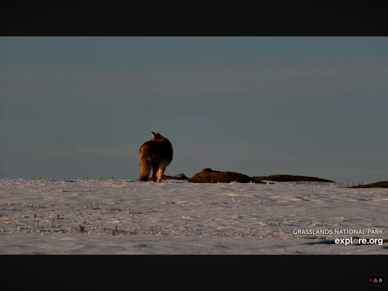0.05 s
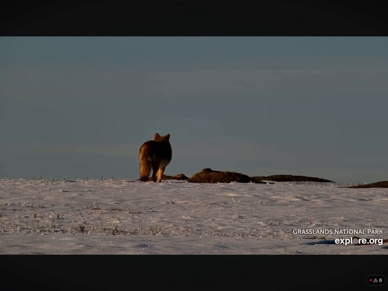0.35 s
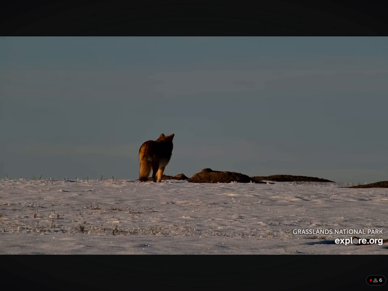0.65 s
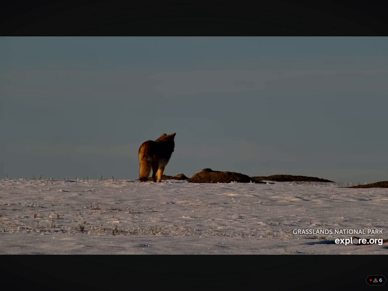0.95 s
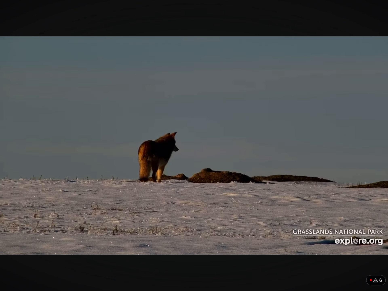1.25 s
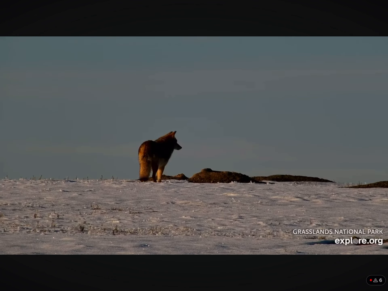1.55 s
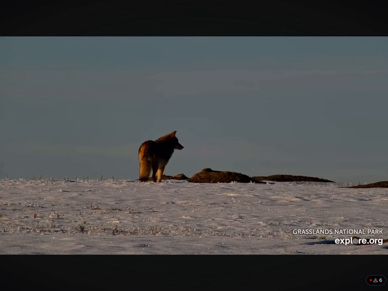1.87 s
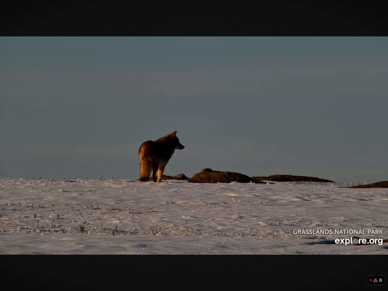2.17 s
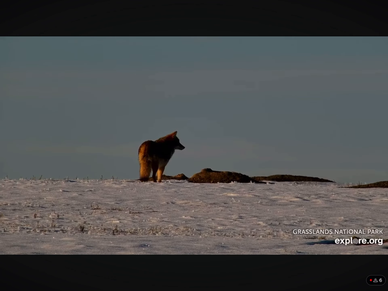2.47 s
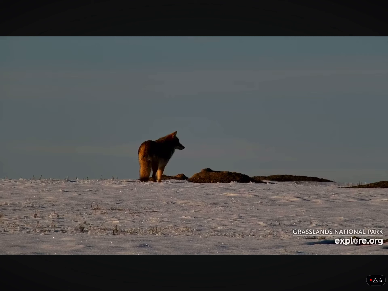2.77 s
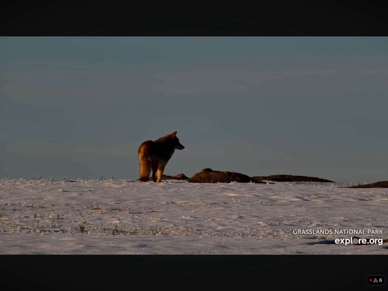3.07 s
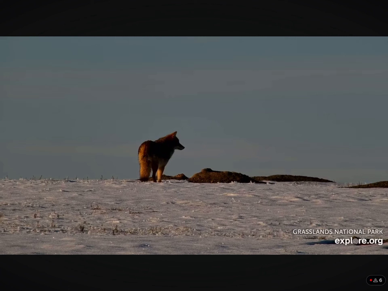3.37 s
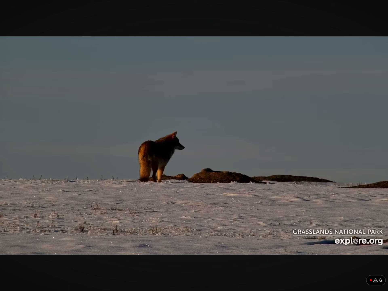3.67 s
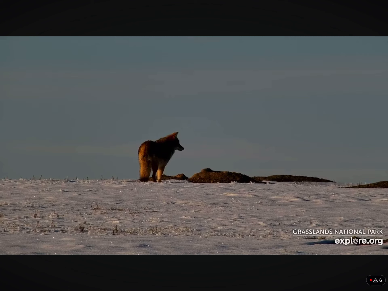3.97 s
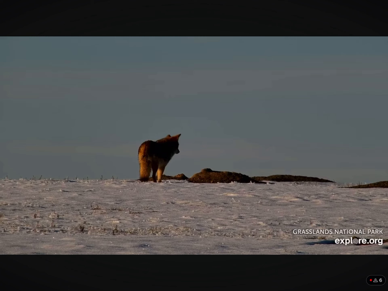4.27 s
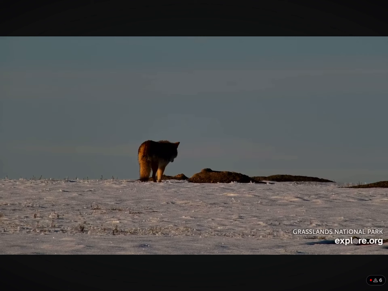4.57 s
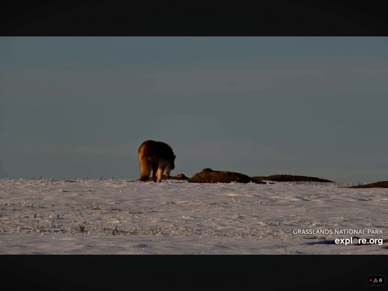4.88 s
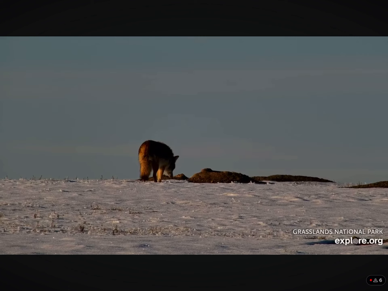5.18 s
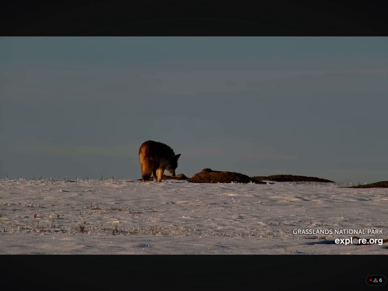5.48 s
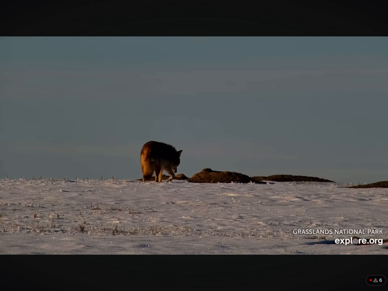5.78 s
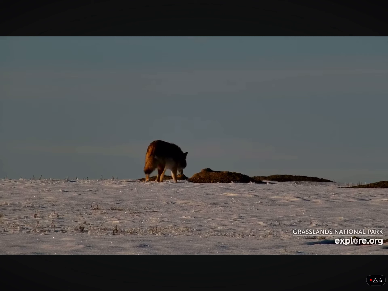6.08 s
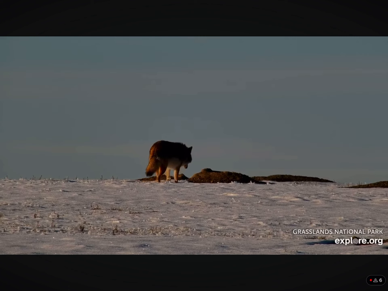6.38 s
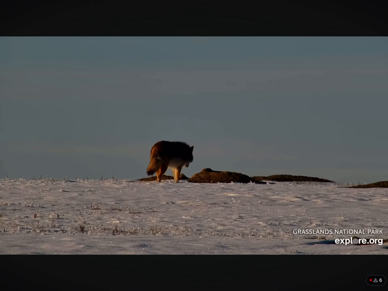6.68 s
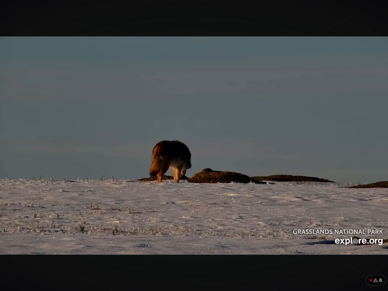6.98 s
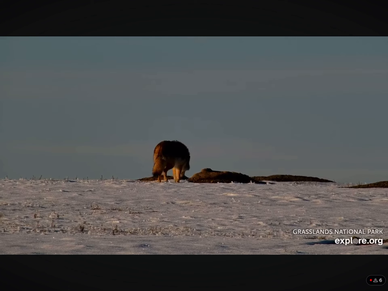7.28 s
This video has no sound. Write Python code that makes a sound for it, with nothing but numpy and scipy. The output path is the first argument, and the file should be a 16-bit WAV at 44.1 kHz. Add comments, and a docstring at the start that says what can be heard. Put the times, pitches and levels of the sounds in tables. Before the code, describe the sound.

A small songbird tinkles, whistles and trills over gusts of wind buffeting the microphone, with a faint fan whir and electrical hum.

```python
"""A small songbird sings on an open snowy plain: tinkling whistles and pips, two-pitch trills, a last rattle.
It is heard from an outdoor camera, with gusts buffeting right at the microphone.
Close by, a fan whirs in the camera's housing, and the ripple of its power supply makes a hum
and a faint warbling whine that leaps up, with a thump, at two brief surges."""
import sys
import numpy as np
from scipy import signal
from scipy.fft import rfft, irfft
from scipy.io import wavfile
from scipy.ndimage import uniform_filter1d

SR = 44100
rng = np.random.default_rng(int(sys.argv[2]) if len(sys.argv) > 2 else 0)


def store_wav(level_fs):
    """Save 16-bit WAV to argv[1]."""
    pcm = np.round(np.clip(np.atleast_2d(level_fs), -1, 1) * 32767)
    wavfile.write(sys.argv[1], SR, pcm.T.astype(np.int16))


N = 332514
TIME = np.arange(N) / SR
RIPPLE_HZ = 29.966
RIPPLE = np.cos(2 * np.pi * RIPPLE_HZ * (TIME - .020))   # shared by the supply's hum and whine


def from_db(db):
    """Decibels to gain."""
    return 10 ** (np.asarray(db) / 20)


def rms_one(x):
    """Scale to unit power."""
    return x / np.sqrt(np.mean(x ** 2) + 1e-20)


def butter(x, hz, kind):
    """Causal second-order Butterworth filter."""
    return signal.sosfilt(signal.butter(2, hz, kind, fs=SR, output="sos"), x + 1e-18)


def drift(rate):
    """Random wander of unit power, changing about rate times a second."""
    hz = np.arange(N // 2 + 1) * SR / N
    return rms_one(irfft(rfft(rng.standard_normal(N)) / (1 + (hz / rate) ** 2) ** 2, N))


def noise(spectrum, resonances=()):
    """Noise with a given density per Hz, reshaped around each resonance."""
    hz = np.arange(1, N // 2 + 2) * SR / N
    points, level_db = np.transpose(spectrum)
    gain = from_db(np.interp(np.log(hz), np.log(points), level_db))
    for centre, width, height_db in resonances:
        gain *= from_db(height_db / (1 + ((hz - centre) / width) ** 2) ** 2)
    return irfft(rfft(rng.standard_normal(N)) * gain, N) * np.sqrt(SR / 2)


def tone(hz):
    """A sine that follows a pitch curve."""
    return np.sin(2 * np.pi * (np.cumsum(hz) / SR + rng.random()))


def scatter(sound, tail_db, t60_s=.09):
    """Nearby surfaces scatter a short, faint tail back to the microphone."""
    t = TIME[:SR // 2]
    tail = rng.standard_normal(len(t)) * from_db(-60 * t / t60_s) * (t > .005)
    return sound + from_db(tail_db) * signal.fftconvolve(sound, tail / np.linalg.norm(tail))[:N]


# Fan air and the microphone's own hiss: (frequency [Hz], density [dB per Hz])
AIR_HISS = [(20, -71), (100, -92), (350, -101), (620, -93.5), (850, -105), (1120, -110), (1330, -110),
            (1700, -102), (2150, -104), (2900, -100.5), (3450, -104), (4000, -111), (5600, -117.5),
            (8000, -121.5), (12300, -125), (12800, -133)]
# Air resonances of the housing: (frequency [Hz], width [Hz], height over the hiss [dB])
HOUSING_MODES = [(490, 22, 0), (531.4, 9.5, 9.5), (600, 11, -2.5), (703.3, 15.4, 11.5), (743.2, 46.5, 9.5),
                 (850, 23, 6), (1250, 346, 3.5), (1399, 33.5, 12), (1543, 50, 15), (1690, 100, -1),
                 (2460, 500, 3), (2720, 52, 2), (2900, 25, 0), (3930, 140, 1), (4380, 63, -1.5),
                 (4500, 27, 1), (6190, 45, 9.5)]
# Steady tones of the fan, close to the microphone: (frequency [Hz], rms level [dB])
FAN_TONES = [(301.2, -71), (502, -77), (602.4, -85), (903.9, -79), (936.6, -74), (1808, -78), (2712, -77),
             (2812, -78), (3333, -84.5)]
def fan(wander=.000758, waver_db=1.0):
    """Air noise coloured by the housing, and tones that wander with the fan's speed."""
    speed = 1 + wander * drift(2.615)
    tones = sum(from_db(db + waver_db * drift(10.2)) * tone(hz * speed) for hz, db in FAN_TONES)
    return noise(AIR_HISS, HOUSING_MODES) + np.sqrt(2) * tones


# Supply hum in the camera itself: (multiple of the ripple rate, rms level [dB])
HUM_HARMONICS = [(1, -49.5), (2, -59), (3, -72.5), (4, -75.5), (5, -75.5), (6, -74.5), (8, -74), (14, -82),
                 (15, -92.5)]
def hum(recharge_s=.0352):
    """The supply's ripple hums; a sharp recharge in each cycle adds the upper harmonics."""
    recharge = 2 * np.pi * RIPPLE_HZ * (TIME - recharge_s)
    return sum(np.sqrt(2) * from_db(db) * (np.sin(round(k) * recharge) if round(k) > 1 else RIPPLE)
               for k, db in HUM_HARMONICS)


def whine(rise_hz, load, middle_hz=2085, swing_hz=385, db_per_octave=5, surge_db=2.5, ring_hz=4230):
    """The ripple swings a thin whine up and down; a surge throws it higher and louder."""
    pitch = middle_hz + swing_hz * RIPPLE + 20 * drift(58.8) + rise_hz
    level_db = -66 + db_per_octave * np.log2(pitch / middle_hz) + surge_db * load + .7 * drift(150)
    octave = from_db(-24) * (1 + RIPPLE) * tone(2 * pitch)   # swells at the crest of each swing
    direct = from_db(level_db) * (tone(pitch) + butter(octave, 5500, "low"))
    # a resonance 200 Hz wide rings as the whine sweeps through it
    ringing = from_db(3) * signal.lfilter(*signal.iirpeak(ring_hz, ring_hz / 200, fs=SR), direct)
    housing_echo = from_db(-12) * np.interp(TIME - .001202, TIME, direct)
    return scatter(direct + ringing + housing_echo, tail_db=-18.5)


def eddies(spectrum, crest=3.6):
    """Turbulent rumble of unit power whose strength stays fairly even from eddy to eddy."""
    rumble = noise(spectrum)
    power = uniform_filter1d(uniform_filter1d(rumble ** 2, size=1000), size=1000)
    even = rms_one(rumble / (abs(power) + 1e-20) ** .45)
    envelope = abs(signal.hilbert(even))
    return rms_one(even / np.sqrt(1 + (envelope / crest) ** 2))


def puff(peak_s, length, level_db, steep_rise=1.63, steep_fall=1.86):
    """Strength of one puff of wind as it swells and dies away."""
    phase = 2 * (TIME - peak_s) / length
    return from_db(level_db) / (1 + abs(phase) ** np.where(phase < 0, steep_rise, steep_fall))


# Puffs of wind right on the microphone: (peak time [s], length [s], level [dB])
WIND_PUFFS = [(.01, 0.04, -43.5), (0.088, 0.039, -37.5), (0.171, 0.05, -33.5), (0.287, 0.11, -32.5),
              (0.342, 0.049, -28.5), (0.441, 0.032, -34), (0.534, 0.074, -32.5), (0.62, 0.018, -37.5),
              (0.68, 0.066, -37), (0.792, 0.11, -45.5), (0.869, 0.012, -40.5), (1.045, 0.23, -41),
              (1.16, 0.1, -35.5), (1.258, 0.024, -35.5), (1.305, 0.072, -38.5), (1.427, 0.02, -42),
              (1.473, 0.011, -31.5), (1.531, 0.042, -39), (2.062, 0.052, -40), (2.151, 0.1, -41.5),
              (2.348, 0.11, -45.5), (2.577, 0.057, -43), (2.71, 0.049, -49), (3.27, 0.11, -54),
              (3.465, 0.042, -42.5), (3.522, 0.07, -42.5), (3.69, 0.023, -47.5), (4.096, 0.051, -46),
              (4.148, 0.056, -45.5), (4.215, 0.04, -46), (4.51, 0.014, -41), (4.617, 0.1, -39.5),
              (4.692, 0.036, -38), (4.794, 0.025, -42.5), (4.926, 0.041, -48.5), (4.991, 0.013, -46.5),
              (5.172, 0.031, -50), (5.292, 0.15, -53), (5.447, 0.038, -47), (6.115, 0.055, -44),
              (6.204, .025, -57)]
# Buffeting of a light breath of wind: (frequency [Hz], relative density [dB])
BREEZE_SPECTRUM = [(15, -21.5), (35, -0.5), (65, 4.5), (120, -5.5), (180, -17.5), (260, -30), (400, -37),
                   (800, -95)]
# Buffeting of a full gust: (frequency [Hz], relative density [dB])
GUST_SPECTRUM = [(15, -28), (35, -4), (70, -2.5), (118, 6), (155, -4), (200, -4.5), (260, -14), (400, -27),
                 (800, -43), (1500, -61)]
def wind(calm_db=-65, full_db=-29.5, lumpy_db=1.0, top_hz=2000):
    """Wind buffets the microphone; stronger gusts shed smaller eddies, so the rumble reaches higher."""
    level = np.sqrt(from_db(calm_db) ** 2 + sum(puff(*row) ** 2 for row in WIND_PUFFS))
    force = np.tanh((level / from_db(full_db)) ** 1.38)
    rumble = np.sqrt(1 - force) * eddies(BREEZE_SPECTRUM) + np.sqrt(force) * eddies(GUST_SPECTRUM)
    return butter(level * rumble * from_db(lumpy_db * drift(27)), top_hz, "low")


def note(centre, length, start_hz, end_hz, db, steep, quaver=.0031, grain_s=.002, swell_db=0):
    """One gliding bird note that swells and fades; a fine-grained quaver in pitch makes it rasp."""
    half = max(round(length * SR / 2), 4)
    phase = np.arange(-3 * half, 3 * half) / half   # the body of the note spans -1 to 1
    envelope = signal.windows.tukey(len(phase)) / (1 + abs(phase) ** steep)
    glide = start_hz + (end_hz - start_hz) * (phase + 1) / 2
    unsteady = np.interp(TIME[:len(phase)], np.arange(200) * grain_s, rng.standard_normal(200))
    sound = from_db(db + swell_db * phase / 2) * envelope * tone(glide * (1 + quaver * unsteady))
    at = round(centre * SR) + np.arange(-3 * half, 3 * half)
    inside = (at >= 0) & (at < N)
    out = np.zeros(N)
    out[at[inside]] = sound[inside]
    return out


def pip(centre, length, hz, db, sag=.015, mistune=.0044, uneven_db=1.7):
    """A tiny rounded note that sags in pitch, never sung quite the same twice."""
    hz *= 1 + mistune * rng.standard_normal()
    db += uneven_db * rng.standard_normal()
    return note(centre, length, hz * (1 + sag / 2), hz * (1 - sag / 2), db, steep=2.7)


# Runs of pips from the bird on the plain: (first time [s], last time [s], pips [count], slowing
# [share of period], pitch [Hz], pip length [s], start level [dB], middle level [dB], end level [dB])
TRILL_RUNS = [(.003, 0.345, 9, 0.0024, 4770, 0.0071, -68.5, -70, -72),
              (.387, 0.825, 11, 0, 4770, .0079, -84, -80, -80),
              (2.152, 3.071, 23, 0.0011, 4320, 0.0044, -49, -56, -59),
              (2.369, 3.113, 11, 0.032, 4270, 0.0046, -51, -46, -50),
              (2.406, 3.149, 11, 0.061, 3676, .0068, -59.5, -57, -64),
              (2.417, 3.159, 11, 0.035, 3710, 0.0057, -59, -63, -64),
              (4.635, 5.501, 13, 0.063, 4370, 0.0042, -61, -64, -60),
              (4.666, 5.536, 13, 0.055, 3805, 0.0061, -53, -57.5, -58.5)]
def trills():
    """Pips repeat on one pitch, gradually slowing; overlapping runs interleave into two-pitch trills."""
    out = np.zeros(N)
    for first, last, count, slowing, hz, length, *levels_db in TRILL_RUNS:
        along = np.linspace(0, 1, round(count))
        times = first + (last - first) * (along - slowing / 2 * along * (1 - along))
        for centre, db in zip(times, np.interp(along, [0, .5, 1], levels_db)):
            out += pip(centre, length, hz, db)
    return out


# Held notes of the song: (time [s], length [s], pitch [Hz], fall [share of pitch, negative rises],
# level [dB], gap to the closing pip [s], that pip's level relative to the note [dB])
SONG_WHISTLES = [(1.038, 0.028, 7170, .005, -72, .009, -3), (1.23, .078, 2825, 0.021, -64.5, .01, -10),
                 (1.276, .024, 5040, 0.011, -56.5, 0.0075, -1),
                 (1.486, 0.029, 5820, -0.0074, -56.5, 0.0088, -1.5),
                 (1.651, 0.028, 4220, .035, -51, .009, -3), (1.802, 0.025, 3345, 0.022, -43.5, 0.0086, -3),
                 (1.819, 0.029, 4784, 0.031, -46.5, 0.013, -6), (1.923, .034, 4750, 0.053, -48, .017, -7),
                 (1.987, 0.023, 4265, 0.03, -45.5, 0.013, -5), (2.044, 0.022, 3345, 0.0019, -44, 0.01, -6),
                 (2.1, .064, 1965, .029, -65, .01, -10), (2.111, .033, 5370, 0.015, -59, .021, -6),
                 (2.256, 0.026, 4253, 0.0099, -47.5, 0.011, -2.5), (3.853, .026, 6850, -.06, -77, .012, -8),
                 (4.124, .033, 5140, .018, -64, 0.016, -1), (4.271, 0.024, 4650, 0.0081, -59, .015, -7),
                 (4.393, .025, 5880, 0.014, -72, .019, -7), (4.524, 0.027, 4560, 0.015, -58, 0.019, -6),
                 (5.55, .023, 4490, .004, -77, .012, -8), (6.179, .023, 4490, .002, -71, .016, -11),
                 (7.078, .021, 4810, 0.019, -74.5, .012, -10), (7.515, .025, 4760, .05, -70, .012, -8)]
def whistles(pip_s=.0074, lead_s=.006, closing_drop=.0053):
    """Pure, crisp-edged whistles, led in by a faint pip and breaking off into a slightly lower one."""
    out = np.zeros(N)
    for start, length, hz, fall, db, gap, closing_db in SONG_WHISTLES:
        first_hz, last_hz = hz * (1 + fall / 2), hz * (1 - fall / 2)
        out += pip(start - lead_s, pip_s, first_hz, db - 11)
        out += note(start + length / 2, length, first_hz, last_hz, db, steep=11, quaver=.005, swell_db=1.5)
        out += pip(start + length + gap, pip_s, last_hz * (1 - closing_drop), db + closing_db)
    return out


# Lone short notes of the song: (time [s], pitch [Hz], level [dB])
SONG_PIPS = [(1.628, 4370, -63), (1.726, 3630, -46), (1.871, 3380, -42.5), (1.899, 4520, -52.5),
             (2.059, 4280, -51), (2.109, 3290, -43), (2.328, 4210, -49.5), (4.201, 4830, -69),
             (4.343, 4570, -60.5), (4.595, 4500, -61), (5.632, 4350, -72)]
def single_pips(length_s=.0069):
    """The bird drops single tinkling pips between its whistles."""
    return sum(pip(centre, length_s, hz, db) for centre, hz, db in SONG_PIPS)


def arch(centre, length):
    """A parabola of height 1 around a moment, zero elsewhere."""
    return np.maximum(1 - (2 * (TIME - centre) / length) ** 2, 0)


# Supply surges and their rebounds: (time [s], length [s], whine rise [Hz], level before filtering [dB])
SUPPLY_SURGES = [(5.4825, 0.029, 3180, -25), (5.525, .015, 1300, -44), (5.687, .030, 3050, -24),
                 (5.733, .014, 1003, -41)]
def surges(lead_s=.0079, thump_hz=70, coupling_hz=2.74):
    """Brief surges in the camera's supply give the whine's rise in pitch, the load and a thump."""
    rise_hz, load, step = np.zeros((3, N))
    for centre, length, peak_hz, db in SUPPLY_SURGES:
        surge = arch(centre, length)
        rise_hz += peak_hz * surge
        load += np.sqrt(surge)
        step += from_db(db) * np.sqrt(arch(centre - lead_s, .87 * length))
    # the step is rounded, and undershoots behind the coupling capacitor
    thump = butter(butter(step, thump_hz, "low"), coupling_hz, "high")
    return rise_hz, load, thump


# Chips of the bird's closing call:
# (time [s], slur level [dB], gap to the burr [s], burr pitch [Hz], burr length [s], burr level [dB])
RATTLE_CHIPS = [(7.2405, -59, .0115, 3910, 0.0063, -51.5), (7.287, -49, .0115, 4170, .005, -46),
                (7.342, -50, .0108, 3970, 0.0038, -47), (7.4033, -50, 0.01, 3840, 0.0028, -52)]
def rattle(grain_s=.0005, rough_db=5, throat_hz=(3550, 4800)):
    """Four raspy chips, each a quick upward slur and a rough burr, shaped by the throat."""
    out = np.zeros(N)
    for time, slur_db, gap, hz, length, burr_db in RATTLE_CHIPS:
        out += note(time, .0065, 3900, 4920, slur_db, steep=3.2, quaver=.035, grain_s=grain_s)
        out += note(time + gap, length, hz, hz, burr_db, steep=3, quaver=.055, grain_s=grain_s)
    roughness = rms_one(from_db(rough_db * drift(900)))
    return butter(out * roughness, throat_hz, "band")


def scene(flutter_db=1.1):
    """One microphone: the bird out on the plain, over the wind and the camera's own close sounds."""
    song = (trills() + whistles() + single_pips()) * from_db(flutter_db * drift(90))
    bird = scatter(song + rattle(), tail_db=-12)
    rise_hz, load, thump = surges()
    supply = hum() + whine(rise_hz, load) + thump
    return (bird + wind() + fan() + supply)[None]


def record(dry, cutoff_hz=15700):
    """The top is cut steeply by a filter that is already running."""
    running = np.pad(dry, ((0, 0), (SR // 10, 0)), mode="reflect")
    lowpass = signal.ellip(10, .1, 80, cutoff_hz, fs=SR, output="sos")
    return signal.sosfilt(lowpass, running)[:, -N:]


dry = scene()
out = record(dry)
store_wav(out)
```